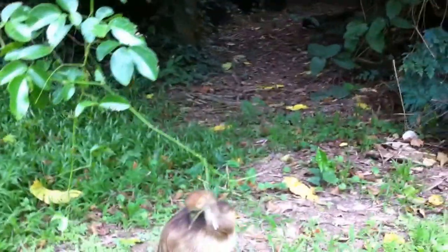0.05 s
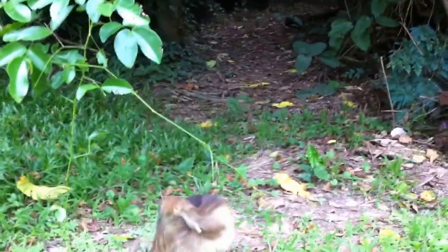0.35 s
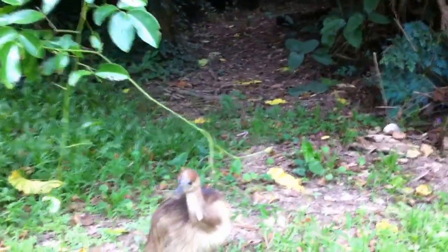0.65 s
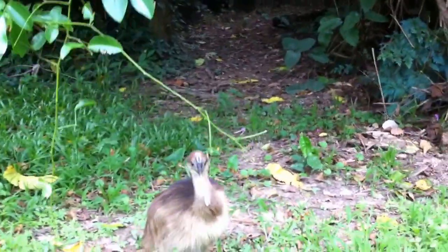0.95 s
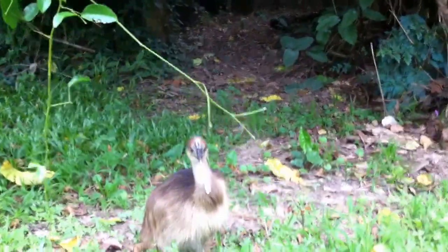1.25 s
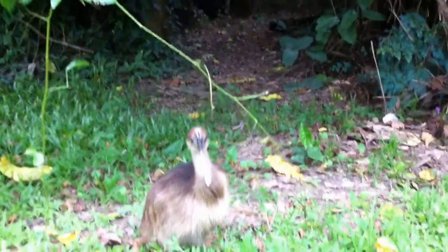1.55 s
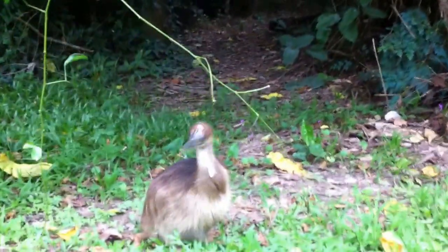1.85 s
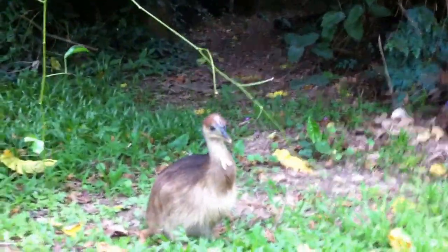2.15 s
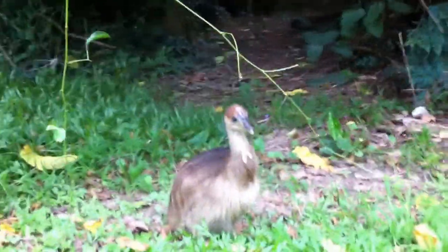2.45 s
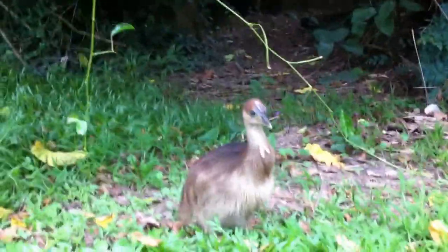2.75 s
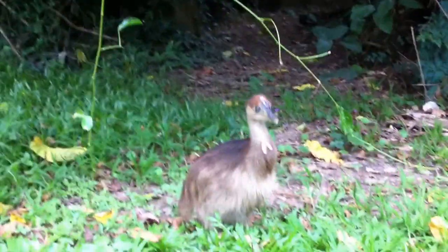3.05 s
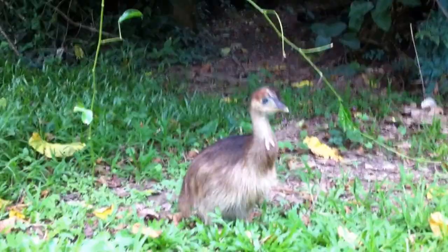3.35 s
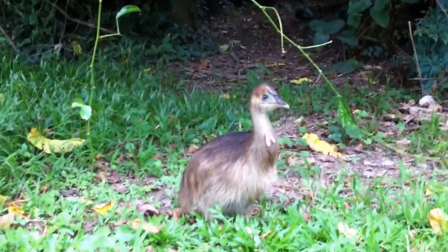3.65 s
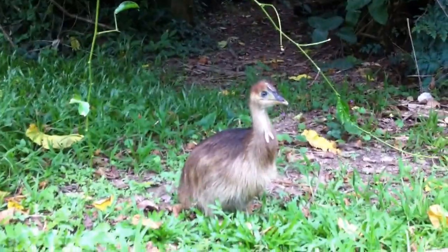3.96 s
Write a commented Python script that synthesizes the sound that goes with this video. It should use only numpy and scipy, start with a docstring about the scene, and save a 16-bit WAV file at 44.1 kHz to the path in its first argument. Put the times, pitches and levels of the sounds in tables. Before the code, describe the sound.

A steady, high cicada buzz over far-off bird chirps, with one brief microphone bump.

```python
"""Cicadas buzz steadily at a warm forest's edge, one nearer than the chorus, over a low distant rumble.
Each muscle stroke buckles a run of ribs that ring the insect's abdomen near 8 kHz.
Small birds whistle far off among the trees; dry leaves hiss and briefly crackle.
A hand shifts on a camera: skin sticks and slips in a few soft rubs, the casing ticks,
then a longer rub ends in a sharp knock."""
import sys
import numpy as np
from scipy import signal
from scipy.fft import rfft, irfft
from scipy.io import wavfile

SR = 44100
rng = np.random.default_rng(int(sys.argv[2]) if len(sys.argv) > 2 else 0)


def to_wav(sig):
    """Store sig (one row per channel, or 1-D mono) as 16-bit WAV at the path in sys.argv[1].

    Samples outside -1..1 are clipped; the rate is SR.
    """
    pcm = np.clip(np.atleast_2d(sig), -1, 1) * 32767
    pcm = np.round(pcm).astype(np.int16)
    wavfile.write(sys.argv[1], SR, pcm.T)  # frames by channels


N = 176400
TIME = np.arange(N) / SR

# abdomen resonance: freq_hz, density_db
BUZZ_SPECTRUM = [(5800, -35.5), (6600, -22.5), (7000, -10.5), (7350, -2), (7800, 2), (8300, 1.5),
                 (8650, -4), (9100, -13), (9550, -38), (11000, -68)]


def from_db(db):
    """Decibels to gain."""
    return 10 ** (np.asarray(db) / 20)


def unit_rms(x):
    """Scale to RMS 1."""
    return x / np.sqrt(np.mean(x ** 2) + 1e-20)


def colour(x, spectrum):
    """Filter by (freq_hz, density_db) points; RMS 1."""
    hz, db = np.transpose(spectrum)
    bins_hz = np.maximum(np.fft.rfftfreq(N, 1 / SR), 1)
    gain = from_db(np.interp(np.log(bins_hz), np.log(hz), db))
    return unit_rms(irfft(rfft(x) * gain, N))


def butter(x, order, edges_hz, kind):
    """Butterworth filter."""
    return signal.sosfilt(signal.butter(order, edges_hz, kind, fs=SR, output="sos"), x)


def drift(rate_hz):
    """Smooth random motion; RMS 1."""
    bins_hz = np.fft.rfftfreq(N, 1 / SR)
    return unit_rms(irfft(rfft(rng.standard_normal(N)) / (1 + (bins_hz / rate_hz) ** 2), N))


def bump(centre_s, sigma_s):
    """Gaussian envelope; peak 1."""
    return np.exp(-.5 * ((TIME - centre_s) / sigma_s) ** 2)


def add(out, start_s, sound):
    """Mix a sound in at start_s."""
    i = int(np.clip(start_s * SR, 0, N))
    out[i:i + len(sound)] += sound[:N - i]


def near_cicada(stroke_hz=91.78, ribs=6, rib_gap_s=.00168, rib_loss_db=.6, level_db=-47):
    """Each muscle stroke buckles the ribs in turn; their clicks ring the abdomen."""
    cycles = np.cumsum(stroke_hz * (1 + .002 * drift(3))) / SR
    strokes_s = np.flatnonzero(np.diff(np.floor(cycles))) / SR
    jitter_s = rng.normal(0, .00019, (1000, ribs))[:len(strokes_s)]
    rough_db = rng.normal(0, 1.6, (1000, ribs))[:len(strokes_s)]
    clicks = np.zeros(N)
    for rib in range(ribs):
        at = ((strokes_s + rib * rib_gap_s + jitter_s[:, rib]) * SR).astype(int) % N
        clicks[at] += from_db(rough_db[:, rib] - rib_loss_db * rib)
    return from_db(level_db) * colour(clicks, BUZZ_SPECTRUM)


def cicada_chorus(level_db=-43.5, flutter_db=.78):
    """Many insects, blurred by the trees into a fluttering band of noise."""
    buzz = colour(rng.standard_normal(N), BUZZ_SPECTRUM)
    return buzz * from_db(level_db + flutter_db * drift(32))


def forest_air(level_db=-56):
    """Distant rumble and broad leaf hiss, with a faint wavering hum."""
    # rumble and hiss: freq_hz, density_db
    air_spectrum = [(20, -24), (45, -46), (75, -18), (96, -2), (118, -8), (150, -2.5), (220, 1), (290, -7),
                    (450, -11), (570, -9.5), (1050, -9), (1600, -13.5), (2200, -10.5), (3500, -10),
                    (4500, -13), (6200, -9.5), (9500, -13.5), (13000, -52)]
    # far hum: pitch_hz, level_db
    hum_tones = [(97, -86.5), (151, -72), (176, -74)]
    hum = np.zeros(N)
    for hz, db in hum_tones:
        phase = 2 * np.pi * hz * TIME
        hum += from_db(db) * (drift(3.4) * np.cos(phase) + drift(4.1) * np.sin(phase))
    return from_db(level_db) * colour(rng.standard_normal(N), air_spectrum) + hum


def leaf_hiss(trim_db=-2, flicker_db=2):
    """Thin, flickering hiss of leaves in the top treble."""
    # hiss: freq_hz, density_db
    hiss_spectrum = [(5000, -43), (9800, 2.5), (11000, -3.5), (11900, 4), (13200, -20), (15500, -10)]
    # hiss contour: time_s, gain_db
    contour = [(0.0, -65.5), (.4, -62), (.6, -65.5), (2.0, -65.5), (2.3, -59.5), (2.47, -72.5),
               (4.0, -67.5)]
    hiss = colour(rng.standard_normal(N), hiss_spectrum)
    contour_db = np.interp(TIME, *np.transpose(contour))
    return hiss * from_db(contour_db + trim_db + flicker_db * drift(20))


def bird_note(pitch_hz, waver_share=.0074, waver_hz=200, scatter_share=.55, scatter_hz=300):
    """A wavering tone swells and fades along a pitch path; foliage roughens it."""
    t = np.arange(len(pitch_hz)) / SR
    knots, grid = rng.standard_normal((3, 200)), np.arange(200)
    waver = 1 + waver_share * np.interp(t * waver_hz, grid, knots[0])
    scatter = 1 + scatter_share * np.interp(t * scatter_hz, grid, knots[1] + 1j * knots[2])
    swell = np.sqrt(np.abs(np.sin(np.linspace(0, np.pi, len(t)))))
    tone = scatter * np.exp(2j * np.pi * np.cumsum(pitch_hz * waver) / SR)
    return np.sqrt(2) * swell * tone.real


def forest_echo(x, t60_s=.5, echoes_per_s=500, wet_db=-9.5):
    """Add sparse echoes from trunks and leaves."""
    t = TIME[:SR]
    echoes = rng.standard_normal(SR) * (rng.random(SR) < echoes_per_s / SR)
    echoes *= from_db(-60 * t / t60_s) * (t > .01)
    return x + from_db(wet_db) * signal.fftconvolve(x, echoes / np.linalg.norm(echoes))[:N]


def far_chirps(chirps_per_s=45, lowest_hz=2402, pitch_span_ratio=2.2, softest_db=-70.5):
    """The farthest birds: short random glides."""
    out = np.zeros(N)
    for when, span, pitch, glide, loud in rng.random((int(chirps_per_s * N / SR), 5)):
        progress = np.linspace(0, 1, int((.0294 + .073 * span) * SR))
        hz = lowest_hz * pitch_span_ratio ** pitch * (1 + .1555 * (glide - .5) * progress)
        add(out, when * N / SR, from_db(softest_db + 2 * loud) * bird_note(hz))
    return out


def bird_whistles():
    """Each whistle bends along a parabola through three pitches."""
    # whistles: start_s, length_s, start_hz, middle_hz, end_hz, level_db
    calls = [(0.171, 0.11, 3950, 3770, 3720, -61.5), (0.167, 0.076, 2390, 2530, 2700, -64),
             (0.392, 0.18, 2420, 2717, 2755, -66), (.485, .075, 4230, 4200, 4130, -63.5),
             (.50, 0.082, 5580, 5520, 5530, -60), (0.635, 0.15, 2710, 2563, 2820, -65),
             (.735, .1, 4240, 4170, 3960, -66), (0.953, 0.048, 1850, 1976, 1890, -58),
             (0.988, 0.33, 4880, 4950, 4800, -66.5), (1.172, 0.116, 3670, 3620, 3640, -59.5),
             (1.675, .05, 3040, 2890, 2850, -60.5), (2.536, 0.058, 3465, 3570, 3640, -60),
             (2.61, 0.12, 3690, 3730, 3715, -58), (2.96, .14, 1114, 1170, 1127, -62),
             (3.414, 0.072, 1480, 1750, 1730, -62), (3.663, 0.092, 3500, 3434, 3390, -60.5),
             (3.759, 0.12, 1950, 1690, 2070, -63.5), (3.921, 0.074, 2157, 1810, 1720, -62),
             (3.953, 0.041, 3160, 3000, 3000, -60)]
    out = np.zeros(N)
    for start_s, length_s, start_hz, middle_hz, end_hz, db in calls:
        progress = np.linspace(0, 1, int(length_s * SR))
        arch = np.polyfit([0, .5, 1], [start_hz, middle_hz, end_hz], 2)
        add(out, start_s, from_db(db) * bird_note(np.polyval(arch, progress)))
    return out


def hand_brushes(flutter_db=2):
    """The hand brushes the grip: soft swells of friction noise."""
    # swells: centre_s, sigma_s, level_db
    swells = [(.27, 0.12, -60), (.64, 0.052, -61.5), (1.12, 0.027, -54), (1.7, .021, -58.5),
              (2.36, 0.087, -52.5), (2.85, 0.18, -60), (3.571, 0.059, -51)]
    # friction: freq_hz, density_db
    brush_spectrum = [(150, -21), (400, -0.5), (1200, 0), (3000, -3.5), (6000, -5), (9000, -11),
                      (15000, -27)]
    envelope = sum(from_db(db) * bump(centre_s, sigma_s) for centre_s, sigma_s, db in swells)
    friction = colour(rng.standard_normal(N), brush_spectrum)
    return envelope * friction * from_db(flutter_db * drift(60))


def casing_knocks(contact_hz=3460, crack_db=-15, db_per_octave=30, db_per_ring_doubling=20):
    """A short crack and a damped ring of the casing; gentler knocks are duller and ring longer."""
    # knocks: start_s, strength_db, ring_hz
    hits = [(.245, -42.5, 1050), (.330, -39.5, 1060), (1.118, -40.5, 470), (2.3361, -28.5, 660),
            (2.3383, -33, 1370), (2.3584, -31, 635), (2.3618, -38, 800), (3.5167, -35, 1700),
            (3.6358, -15, 1030), (3.701, -31.5, 1204), (3.891, -40, 1530)]
    # casing modes at the hardest knock: pitch_ratio, gain_db, t60_s
    modes = [(.45, -22.5, 0.011), (1, 0.5, 0.0035), (1.9, -8, 0.0015)]
    out, t = np.zeros(N), TIME[:SR // 20]
    hardest_db = max(db for _, db, _ in hits)
    for start_s, db, ring_hz in hits:
        relative_db = db - hardest_db
        cutoff_hz = np.clip(contact_hz * 2 ** (relative_db / db_per_octave), 1.9 * ring_hz, SR / 3)
        damping = 2 ** (relative_db / db_per_ring_doubling)
        ring = sum(from_db(gain_db - 60 * damping * t / t60_s) * np.cos(2 * np.pi * ring_hz * ratio * t)
                   for ratio, gain_db, t60_s in modes)
        crack = damping * from_db(crack_db) * np.exp(-t * SR / 2)
        add(out, start_s, -from_db(db) * (crack + butter(ring, 3, cutoff_hz, "low")))
    return butter(out, 2, 160, "high")


def bird_chatter(pips_per_s=55, pip_s=.028, spread_octaves=.2, fall_octaves=.1):
    """Runs of quick falling pips, each at its own pitch."""
    # runs: start_s, length_s, centre_hz, level_db
    runs = [(.27, .1, 3710, -64.5), (1.238, 0.098, 3700, -64.5), (1.537, .25, 3300, -65),
            (1.675, .2, 4360, -66.5), (2.793, .15, 5430, -61), (3.691, .1, 3670, -63.5)]
    out, ramp = np.zeros(N), np.linspace(-.5, .5, int(pip_s * SR))
    for start_s, length_s, centre_hz, db in runs:
        for beat_s in np.arange(start_s, start_s + length_s, 1 / pips_per_s):
            octaves = rng.uniform(-spread_octaves, spread_octaves) - fall_octaves * ramp
            jitter_s = rng.uniform(-.5, .5) / pips_per_s
            add(out, beat_s + jitter_s, from_db(db) * bird_note(centre_hz * 2 ** octaves))
    return out


def hand_rubs(slips_per_s=1100, bandwidth_hz=360, fade_s=.0062, skin_db=-8):
    """Skin sticks and slips on the casing; the ring of the slips glides as the grip changes."""
    # rubs: start_s, length_s, level_db, start_hz, end_hz
    rubs = [(.62, 0.034, -61.5, 300, 380), (1.114, .032, -55.5, 427, 800), (2.331, .018, -47.5, 516, 580),
            (3.515, 0.0435, -46, 620, 920), (3.546, .075, -38, 1140, 520)]
    # skin friction: freq_hz, density_db
    skin_spectrum = [(100, -16), (200, 25), (350, 16.5), (570, 26.5), (1200, -31), (1700, 7), (2700, 3),
                     (4000, -30), (12000, -35)]
    out, slips, t = np.zeros(N), np.zeros(N), TIME[:SR // 50]
    at = (np.cumsum(rng.gamma(2, .5, 8000)) / slips_per_s * SR).astype(int)
    slips[at[at < N]] = 1
    slips *= from_db(rng.normal(0, 2.5, N))
    skin = colour(slips - slips.mean(), skin_spectrum)
    decay = np.exp(-np.pi * bandwidth_hz * t)
    for start_s, length_s, db, start_hz, end_hz in rubs:
        end_s = start_s + length_s
        grip = np.clip(np.minimum(TIME - start_s, end_s - TIME) / fade_s, 0, 1)
        squeak = np.zeros(N)
        for i in np.flatnonzero(slips * grip):
            hz = np.interp(TIME[i], [start_s, end_s], [start_hz, end_hz])
            add(squeak, TIME[i], slips[i] * grip[i] * decay * np.cos(2 * np.pi * hz * t))
        squeak = butter(squeak + 1e-18, 2, [300, 1500], "band")
        squeak = unit_rms(squeak) * np.sqrt(length_s * SR / N)  # RMS 1 over the rub
        out += from_db(db) * (squeak + from_db(skin_db) * grip * skin)
    return out


def leaf_crackles(snaps_per_s=2400, bandwidth_hz=2800):
    """Dry leaves give short bursts of tiny snaps."""
    # bursts: centre_s, sigma_s, level_db, centre_hz
    bursts = [(.643, 0.015, -58, 12400), (2.284, .005, -57, 11200), (2.29, .014, -63, 14000),
              (2.36, .022, -61.5, 13800)]
    out = np.zeros(N)
    for centre_s, sigma_s, db, hz in bursts:
        snaps = rng.choice([-1, 1], N) * rng.uniform(.5, 2, N)
        snaps *= rng.random(N) < snaps_per_s / SR
        band = butter(snaps + 1e-18, 2, [hz - bandwidth_hz / 2, hz + bandwidth_hz / 2], "band")
        out += from_db(db) * unit_rms(band) * bump(centre_s, sigma_s)
    return out


def bird_slurs(swell_db=5, drop_width_share=.076):
    """Calls that hold a note, then fall, swelling on the drop."""
    # slurs: start_s, length_s, top_hz, bottom_hz, drop_at_share, level_db
    calls = [(2.043, .097, 3695, 2800, 0.8, -55), (2.816, 0.18, 3780, 2910, 0.64, -56),
             (2.998, .135, 3415, 2610, .85, -60.5), (3.205, .14, 3890, 3020, 0.69, -58.5)]
    out = np.zeros(N)
    for start_s, length_s, top_hz, bottom_hz, drop_at_share, db in calls:
        past_drop = np.linspace(0, 1, int(length_s * SR)) - drop_at_share
        hz = bottom_hz + (top_hz - bottom_hz) / (1 + np.exp(past_drop / drop_width_share))
        accent_db = swell_db * (np.exp(-(4 * past_drop) ** 2) - .5)
        add(out, start_s, from_db(db + accent_db) * bird_note(hz))
    return out


def scene():
    """Mono mix; only the birds echo."""
    cicadas = near_cicada() + cicada_chorus()
    forest = forest_air() + leaf_hiss() + leaf_crackles()
    hand = casing_knocks() + hand_rubs() + hand_brushes()
    birds = bird_whistles() + bird_slurs() + far_chirps() + bird_chatter()
    return (cicadas + forest + hand + forest_echo(birds))[None]


def record(dry):
    """Steep low-pass at 15.6 kHz."""
    return signal.sosfilt(signal.ellip(10, .1, 80, 15600, fs=SR, output="sos"), dry)


dry = scene()
out = record(dry)
to_wav(out)
```